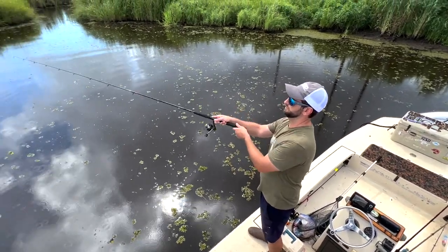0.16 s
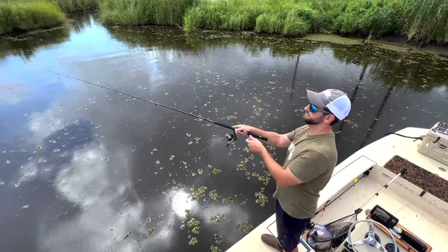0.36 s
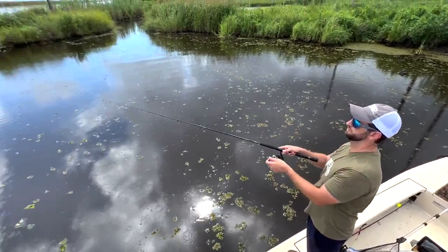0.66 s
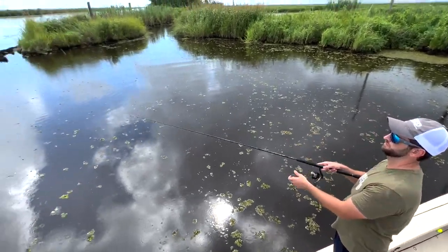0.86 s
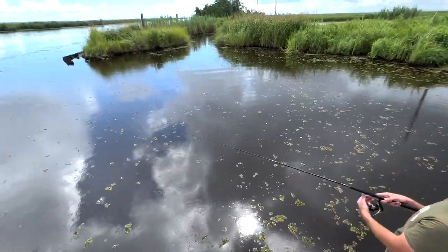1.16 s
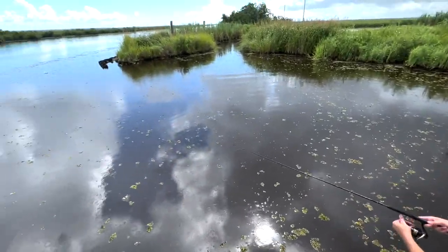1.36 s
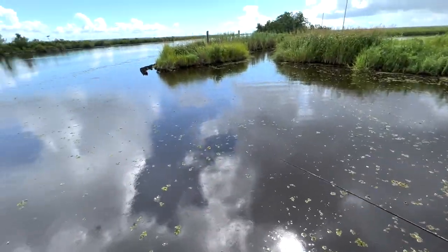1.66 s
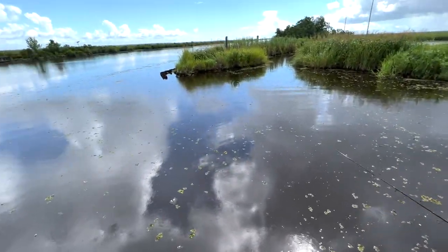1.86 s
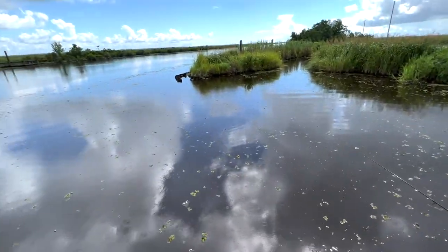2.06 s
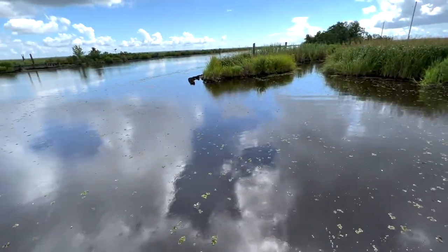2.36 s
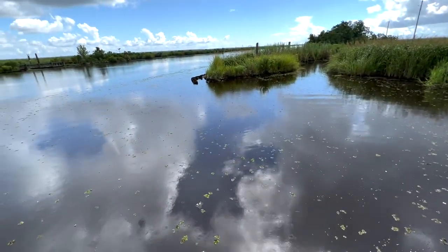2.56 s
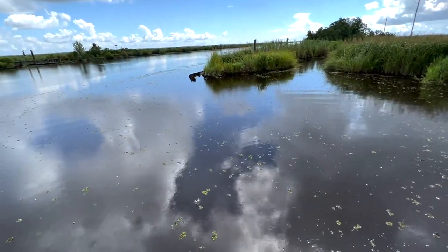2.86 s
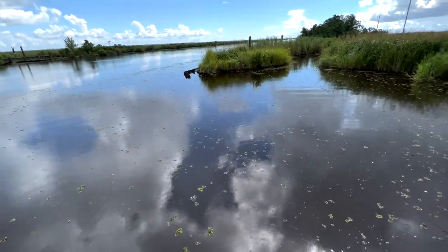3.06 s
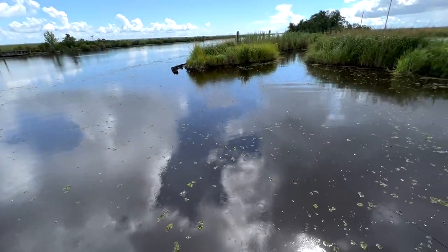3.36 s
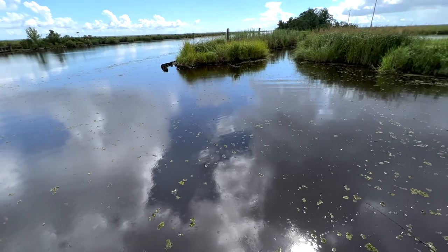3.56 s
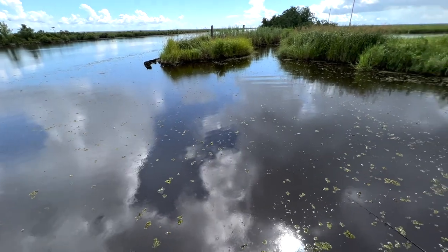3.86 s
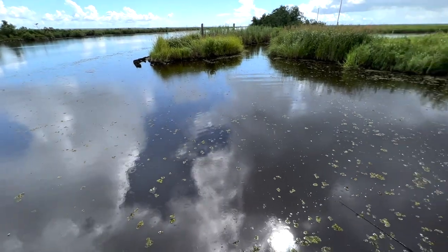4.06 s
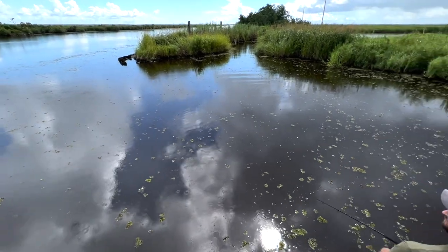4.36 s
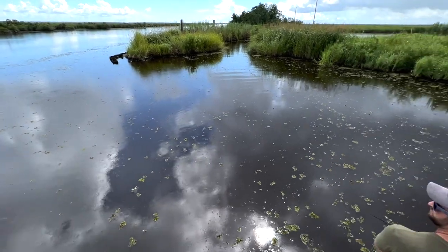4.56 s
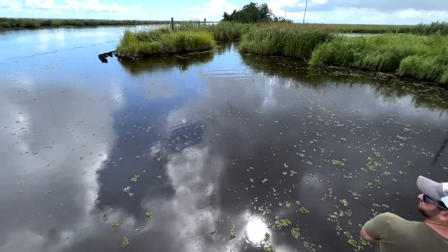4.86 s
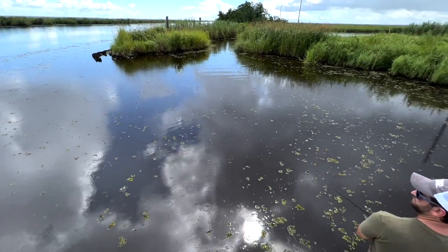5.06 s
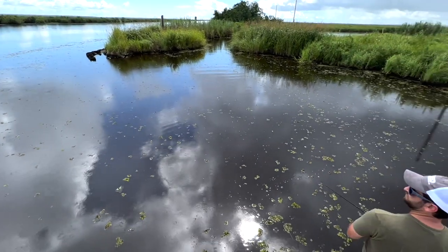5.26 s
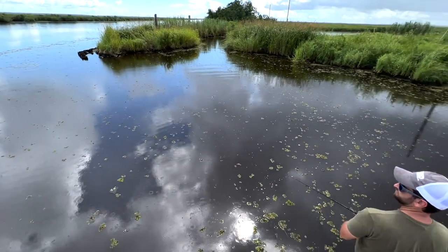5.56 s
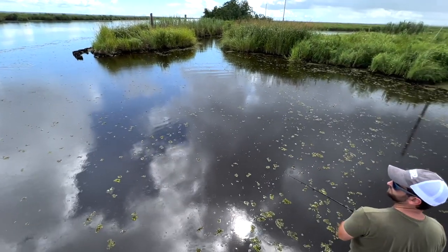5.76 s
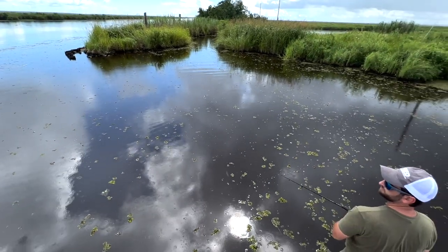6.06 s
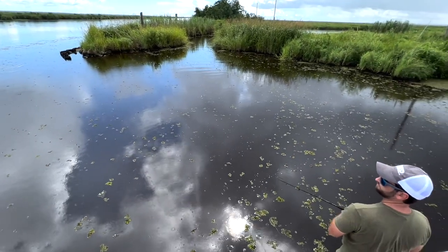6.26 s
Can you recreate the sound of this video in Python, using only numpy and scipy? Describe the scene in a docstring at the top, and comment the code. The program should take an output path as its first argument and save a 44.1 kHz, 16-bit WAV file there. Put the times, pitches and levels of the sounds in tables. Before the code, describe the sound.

A steady, shrill katydid buzz fills an open marsh from 0 to 6.4 seconds, gritty and throbbing about 24 times a second over a shimmering distant chorus. Low air thumps hit the left microphone in the first 0.2 seconds, with small tackle ticks and swishes until 0.7. A soft reel whirr pulses until about 2.9, while reeds rustle faintly and wind rumbles, dropping early then returning. Rapid falling chirps sound at 1.3, echoing lightly off water and reeds. The buzz swells hard left around 2.2 to 2.9. Hollow hull knocks land at 2.2 and in a cluster at 2.8 to 2.9. Another chirp follows at 3.0, then a gentle hiss from 3.4 to 4.2 and thin wavering left-side calls, mostly 3.8 to 4.0. A fainter chirp comes at 4.9. From 5.1 a rising, tumbling twitter repeats, clearest after 5.6, as high insect treble brightens.

```python
"""A small fishing boat in a marsh. From the start two katydids buzz over a chorus as the camera turns: gritty scrapes
throbbing with the wing strokes. Low thumps, a pulsing reel whirr, a rumbling wind, reeds and noise-burst scuffs join them.
Then come falling chirps, bent whistles doubled by the water, and knocks that ring the hull's modes. The reel fades
just before 3 s. High wavering calls and a soft swell of filtered hiss follow, and a twittering song ends the scene."""
import sys
import numpy as np
from scipy import signal
from scipy.fft import rfft, irfft, next_fast_len
from scipy.io import wavfile
from scipy.ndimage import uniform_filter1d

SR = 44100
rng = np.random.default_rng(int(sys.argv[2]) if len(sys.argv) > 2 else 0)


def store_wav(level_fs):
    """Save 16-bit WAV to argv[1]."""
    pcm = np.round(np.clip(np.atleast_2d(level_fs), -1, 1) * 32767)
    wavfile.write(sys.argv[1], SR, pcm.T.astype(np.int16))


N = 283241  # samples
TIME = np.arange(N) / SR  # s


def undb(db):
    """Decibels to gain."""
    return 10 ** (np.asarray(db) / 20)


def unit(x):
    """Scale to rms 1."""
    return x / np.sqrt(np.mean(x ** 2))


def curves(table):
    """Turn each column of a table of timed rows into a curve of straight lines."""
    times_s, *columns = np.transpose(table)
    return [np.interp(TIME, times_s, column) for column in columns]


def colour(x, points):
    """Filter by a spectrum of (pitch_hz, level_db) points; rms 1."""
    pitch_hz, level_db = np.transpose(points)
    size = next_fast_len(N)
    bins_hz = np.maximum(np.fft.rfftfreq(size, 1 / SR), 1)
    gains = undb(np.interp(np.log(bins_hz), np.log(pitch_hz), level_db))
    return unit(irfft(rfft(x, size) * gains, size)[..., :N])


def bandpass(x, low_hz, high_hz):
    """Keep one band with a second-order Butterworth filter."""
    return signal.sosfilt(signal.butter(2, [low_hz, high_hz], "band", fs=SR, output="sos"), x)


def noise(likeness, size=N):
    """Left and right white noise with a given correlation."""
    mid, side = rng.standard_normal((2, size))
    c = np.clip(likeness, -1, 1)
    return np.sqrt((1 + c) / 2) * mid + np.sqrt((1 - c) / 2) * np.array([side, -side])


def pan(left_minus_right_db):
    """Left and right gains for a level difference, at the same overall level."""
    gains = undb(np.array([[.5], [-.5]]) * left_minus_right_db)
    return gains / np.sqrt(np.mean(gains ** 2, axis=0))


def walk(rate_hz):
    """Random levels, rate_hz new ones a second, joined by slopes; rms 1."""
    hold = max(int(SR / rate_hz), 1)
    steps = np.repeat(rng.standard_normal(N // hold + 1), hold)
    return unit(uniform_filter1d(steps, hold)[:N])


def add(out, start_s, x):
    """Mix a short stereo sound in at a time."""
    i = max(int(start_s * SR), 0)
    out[:, i:i + x.shape[1]] += x[:, :N - i]


def scatter(x, echo_db, t60_s):
    """Add a dense, short echo that decays as random noise, different at each microphone."""
    t = TIME[:SR // 2]
    tail = rng.standard_normal((2, len(t))) * undb(-60 * t / t60_s)
    tail = unit(tail) / np.sqrt(len(t))
    return x + undb(echo_db) * signal.fftconvolve(x, tail, axes=1)[:, :N]


def mirrored(x, delay_s, level_db):
    """Add a single reflection off the water, at about the same overall level."""
    reflection = np.pad(x, ((0, 0), (int(delay_s * SR), 0)))[:, :N]
    return (x + undb(level_db) * reflection) / np.hypot(1, undb(level_db))


def katydid(stroke_hz, level_db, wing, throb_db, closing_db, tooth_db, likeness, stems_db):
    """The wings open and close once a stroke; uneven file teeth make each scrape gritty."""
    turn = 2 * np.pi * (np.cumsum(stroke_hz) / SR + .025 * walk(20))
    # pressure builds through the stroke and lets go quickly
    pressure_db = throb_db * np.cos(turn) + closing_db * np.sin(2 * turn) + 0.59 * walk(30)
    scrape = undb(pressure_db + tooth_db * walk(1500)) * noise(likeness)
    # echoes from nearby stems ripple the band into narrow peaks
    return colour(scatter(scrape, echo_db=stems_db, t60_s=0.017), wing) * undb(level_db)


PIP_HZ, PIP_PLACE_TURNS, PIP_HALF_LENGTH_S, PIP_SCATTER_DB = 9020, .09, .0024, 3


def pips(stroke_hz):
    """Once a stroke the file teeth fall in step with the wing's resonance and it rings cleanly."""
    turns = np.cumsum(stroke_hz) / SR - PIP_PLACE_TURNS
    from_pip_s = (turns - np.round(turns)) / stroke_hz
    tone = np.sin(2 * np.pi * np.cumsum(PIP_HZ * (1 + .012 * walk(60))) / SR)
    swell = np.exp(-(from_pip_s / PIP_HALF_LENGTH_S) ** 2)
    return unit(tone * swell * undb(PIP_SCATTER_DB * walk(25)))


# what the left katydid's wings radiate: pitch_hz, level_db
LEFT_WING_SPECTRUM = [(4000, -34), (5000, -22), (5700, -25), (6300, -20), (7250, -10), (8100, 0), (8500, 0),
                      (8900, 7), (9200, 6), (9450, 0), (10000, 2), (10200, -5), (11000, -9), (11600, -13),
                      (13000, -32), (16000, -45)]
# wing strokes of the left katydid: time_s, stroke_hz
LEFT_STROKE_RATE = [(0, 24.68), (2.3, 25.0), (3.9, 24.4), (6.42, 24.4)]
# it takes over as the buzz swings left
LEFT_DB, LEFT_ENTERS_AT_SIDE_DB, LEFT_ENTRY_WIDTH_DB = 2.5, -1.5, 1.5
PIP_DB = -8.5  # relative to the scrape
LEFT_ECHO_S, LEFT_ECHO_DB = .003465, -9


def left_katydid(buzz_db, side_db):
    """Scrapes and pure pips reach the camera twice, directly and off the water."""
    stroke_hz, = curves(LEFT_STROKE_RATE)
    scrape = katydid(stroke_hz, 0, LEFT_WING_SPECTRUM, throb_db=3.0, closing_db=0.6, tooth_db=0.7,
                     likeness=0.45, stems_db=-11)
    song = mirrored(scrape + undb(PIP_DB) * pips(stroke_hz), LEFT_ECHO_S, LEFT_ECHO_DB)
    facing_left = 1 / (1 + np.exp((LEFT_ENTERS_AT_SIDE_DB - side_db) / LEFT_ENTRY_WIDTH_DB))
    return song * undb(buzz_db + LEFT_DB) * facing_left * pan(13)


# the front katydid's broad treble: pitch_hz, level_db
FRONT_WING_SPECTRUM = [(5000, -35), (7000, -14), (8300, -7), (9400, -3), (10300, -3), (10800, -3),
                       (11300, 0), (11800, -1), (12500, -3), (14000, -5), (15100, -5), (16000, -8)]
# its main resonance, which favours the right microphone: pitch_hz, level_db
FRONT_RESONANCE = [(7000, -40), (8400, -10), (9250, -1), (9550, 0), (9900, -3), (10300, -8), (11050, -6),
                   (11500, -16), (13000, -40)]
# its wing strokes, drifting in and out of step with the left one: time_s, stroke_hz
FRONT_STROKE_RATE = [(0, 23.9), (1.5, 25.2), (2.2, 24.3), (3.5, 23.45), (4.2, 24.5), (6.42, 24.3)]
# its strokes stand out more once the camera faces it: time_s, throb_db
FRONT_THROB_DEPTH = [(0, 1.5), (1.6, 1.5), (2.1, 3.5), (6.42, 3.5)]
FRONT_DB, FRONT_PEAK_DB = 4.5, 5.5  # relative to the top treble


def front_katydid(treble_db):
    """Two layers share the stroke rate: a broad treble and a shallower-throbbing resonance."""
    stroke_hz, = curves(FRONT_STROKE_RATE)
    throb_db, = curves(FRONT_THROB_DEPTH)
    broad = katydid(stroke_hz, treble_db + FRONT_DB, FRONT_WING_SPECTRUM, throb_db=throb_db,
                    closing_db=0.8, tooth_db=0.8, likeness=0.92, stems_db=-8)
    peak = katydid(stroke_hz, treble_db + FRONT_PEAK_DB, FRONT_RESONANCE, throb_db=throb_db / 2,
                   closing_db=0.3, tooth_db=0.8, likeness=-0.8, stems_db=-6)
    return broad + peak * pan(-13.0)


# what the chorus's wings radiate: pitch_hz, level_db
CHORUS_SPECTRUM = [(4000, -26), (5000, -21), (6100, -11), (7200, -7), (8200, -1), (8700, 0), (9700, 0),
                   (10300, -6), (11500, -14), (13000, -25), (16000, -50)]


def chorus(level_db, side_db):
    """Many distant insects blur into a shimmering band of noise."""
    buzz = noise(-0.68) * undb(2.0 * walk(22) + 2.8 * walk(700))
    return colour(scatter(buzz, echo_db=1.5, t60_s=0.069), CHORUS_SPECTRUM) * undb(level_db) * pan(side_db)


# the far insects' hiss: pitch_hz, level_db
HISS_SPECTRUM = [(7000, -35), (10500, -7.5), (11500, -12), (13000, 26), (15000, -10), (16000, -10)]
HISS_DB = -7  # relative to the top treble


def far_hiss(treble_db):
    """The far insects merge into a high hiss that follows the treble."""
    return colour(noise(0.63), HISS_SPECTRUM) * undb(treble_db + HISS_DB)


# the insects as the camera turns: time_s, buzz_db, buzz_left_minus_right_db, top_treble_db
INSECT_LEVELS = [(0.0, -35.5, -4.5, -46), (0.82, -40.5, 0, -49.5), (1.11, -42, -0.5, -50),
                 (1.52, -40.5, 1.5, -47.5), (1.84, -39.5, 1, -51.5), (2.25, -33, 18, -48),
                 (2.66, -33.5, 17.5, -51.5), (2.95, -36, 9, -53), (3.24, -42.5, 15, -49),
                 (3.43, -38.5, 6, -49.5), (3.86, -38, -0.5, -51.5), (4.27, -40.5, 3, -50.5),
                 (5.09, -40, -2.5, -43.5), (5.42, -42.5, -1, -46), (6.42, -37, -1, -43)]
# the chorus gives way as the buzz swings left; its level is relative to the buzz
CHORUS_DB, CHORUS_YIELD, CHORUS_SIDE_SHARE = -1.5, 0.64, 0.1


def insects():
    """Two near katydids and the chorus trade places as the camera turns."""
    buzz_db, side_db, treble_db = curves(INSECT_LEVELS)
    others = chorus(buzz_db + CHORUS_DB - CHORUS_YIELD * side_db, CHORUS_SIDE_SHARE * side_db + 0.54)
    return left_katydid(buzz_db, side_db) + front_katydid(treble_db) + others + far_hiss(treble_db)


# low thumps on the left microphone: start_s, length_s, level_db
THUMP_PUFFS = [(0, 0.036, -40), (0.048, 0.046, -29.5), (0.116, 0.064, -29), (0.168, 0.047, -43)]
THUMP_HZ, THUMP_OCTAVE_DB = 70.6, -12


def thumps():
    """Puffs of air shake the microphone for a few slow cycles."""
    out = np.zeros((2, N))
    for start_s, length_s, level_db in THUMP_PUFFS:
        t = TIME[:int(length_s * SR)]
        turn = 2 * np.pi * (THUMP_HZ * t + rng.random())
        swing = (np.sin(turn) + undb(THUMP_OCTAVE_DB) * np.sin(2 * turn)) * np.hanning(len(t))
        add(out, start_s, unit(swing) * undb(level_db) * pan(16.15))
    return out


# the reel's whirr: pitch_hz, level_db
REEL_SPECTRUM = [(150, -0.5), (320, 7.5), (600, 2), (800, 1), (1150, 5.5), (1800, -3), (2400, -31),
                 (4000, -22), (9000, -6.5)]
# cranked evenly, then let go
REEL_PUSH_HZ, REEL_FIRST_PUSH_S = 3.55, .26
REEL_DB, REEL_STOP_S, REEL_FADE_DB_PER_S = -51, 2.915, 79


def reel(push_db):
    """The gears whirr harder on each push of the handle."""
    push = np.cos(np.pi * REEL_PUSH_HZ * (TIME - REEL_FIRST_PUSH_S)) ** 2
    whirr = colour(noise(0.69) * undb(push_db * push ** 2 + 3.2 * walk(250)), REEL_SPECTRUM)
    level_db = REEL_DB - REEL_FADE_DB_PER_S * np.maximum(TIME - REEL_STOP_S, 0)
    return whirr * undb(level_db) * pan(4.9)


# the wind drops, picks up unevenly and holds: time_s, level_db
WIND_LEVEL = [(0, -43.5), (0.45, -57.5), (1.35, -49.5), (2.0, -52.5), (2.75, -45), (6.42, -46)]
# its rumble on the microphones: pitch_hz, level_db
RUMBLE_SPECTRUM = [(15, -47), (25, -19), (35, -9), (55, -2), (80, -0.5), (110, 0), (135, -10), (180, -10.5),
                   (230, -11), (280, -20), (400, -20.5), (900, -69.5)]


def wind_rumble():
    """Eddies buffet the microphones as low, slightly uneven noise."""
    rumble = colour(noise(0.73) * undb(0.5 * walk(18)), RUMBLE_SPECTRUM)
    return rumble * undb(curves(WIND_LEVEL)[0]) * pan(-1.6)


# open air over the marsh: pitch_hz, level_db
AIR_SPECTRUM = [(100, -4.5), (250, 2), (420, -1), (600, 1.5), (780, -4.5), (1300, -7), (1900, -12),
                (2400, -22.5), (4000, -28), (6000, -43), (12000, -17)]


def marsh_air(level_db):
    """The hush of the open marsh is broad noise with a slow, slight waver."""
    return colour(noise(0.22), AIR_SPECTRUM) * undb(level_db + 0.65 * walk(5.5))


# rustle of the reeds: time_s, level_db
REED_LEVEL = [(0, -45.5), (.45, -50), (.8, -54.5), (1.4, -53), (2, -63.5), (4.3, -60.5), (6.42, -100)]


def reeds():
    """Leaves rustle as flickering noise with short echoes, strongest near 1.5 kHz."""
    leaves = scatter(noise(0) * undb(0.5 * walk(37)), echo_db=4.0, t60_s=0.027)
    # pitch_hz, level_db
    rustle = colour(leaves, [(500, -12), (900, 6), (1450, 13), (2600, 5.5), (3500, 2), (6000, 9.0),
                             (12000, -39.0)])
    return rustle * undb(curves(REED_LEVEL)[0]) * pan(4.6)


# ticks and scuffs of tackle and clothing: start_s, length_s, centre_hz, level_db, left_minus_right_db
SCUFF_RUBS = [(0.045, 0.028, 10100, -35, -1), (0.217, 0.075, 1200, -54, 2), (0.263, 0.057, 9650, -40, -1.5),
              (0.32, 0.0041, 9200, -31.5, -2), (0.43, 0.005, 7160, -40, 1.5),
              (0.47, 0.0052, 7000, -40.5, 3), (1.082, 0.025, 2865, -53.5, -3),
              (1.178, 0.01, 5850, -46.5, 5), (1.404, 0.022, 5630, -41.5, 5), (2.407, 0.11, 1120, -52, 13),
              (2.696, 0.055, 1240, -51.5, 9), (2.847, 0.016, 6200, -49, 15),
              (2.858, 0.057, 5200, -49.5, 12), (2.922, 0.025, 1320, -51, 11), (3.883, 0.078, 1480, -56, 5),
              (4.157, 0.0069, 1940, -48.5, -1), (4.418, 0.12, 1447, -51.5, 8),
              (4.437, 0.079, 3760, -59.5, 6), (6.332, 0.0077, 2610, -54, 0)]
# quick even swishes of tackle
SWISH_FIRST_S, SWISH_EVERY_S, SWISH_S, SWISH_HZ, SWISH_DB = 0.459, 0.072, 0.042, 11000, -42.5
# a briefer contact is broader: bandwidth as a share of the centre for a tick, and how it narrows with length
TICK_S, TICK_WIDTH, NARROWING = 0.0023, 0.61, 0.073


def scuffs(count):
    """Brief rubs and a run of count swishes: each a gritty swell of friction in one broad resonance."""
    out = np.zeros((2, N))
    swishes = [(SWISH_FIRST_S + k * SWISH_EVERY_S, SWISH_S, SWISH_HZ, SWISH_DB, 0) for k in range(count)]
    for start_s, length_s, centre_hz, level_db, side_db in SCUFF_RUBS + swishes:
        size = int(length_s * SR)
        width_hz = centre_hz * TICK_WIDTH * (TICK_S / length_s) ** NARROWING
        edges_hz = np.clip([centre_hz - width_hz / 2, centre_hz + width_hz / 2], 100, SR * .45)
        grit = noise(0.33, size=size) * undb(6.1 * rng.standard_normal(size)) * np.hanning(size)
        add(out, start_s, unit(bandpass(grit, *edges_hz)) * undb(level_db) * pan(side_db))
    return out


# the open beak favours the octave near this pitch; every note fades over its length
BEAK_HZ, BEAK_HALF_WIDTH_HZ, NOTE_FADE_DB = 5230, 810, 1


def bird(notes, rough, octave_db, right_lag_ms):
    """Each note is a whistle bent through three pitches; flutter in the syrinx roughens it."""
    out, waver = np.zeros((2, N)), walk(900)
    for start_s, length_s, first_hz, middle_hz, last_hz, level_db, side_db in notes:
        u = np.linspace(0, 1, int(length_s * SR))  # place in the note
        pitch_hz = np.polyval(np.polyfit([0, .5, 1], [first_hz, middle_hz, last_hz], 2), u)
        flutter = rough * np.roll(waver, -int(start_s * SR))[:len(u)]
        cycles = np.cumsum(pitch_hz * (1 + flutter)) / SR
        phase = 2 * np.pi * np.array([cycles, cycles - pitch_hz * right_lag_ms / 1000])
        beak = undb(octave_db) / (1 + ((2 * pitch_hz - BEAK_HZ) / BEAK_HALF_WIDTH_HZ) ** 2)
        envelope = signal.windows.tukey(len(u), .38) * undb(-NOTE_FADE_DB * u)
        tone = (np.sin(phase) + beak * np.sin(2 * phase)) * envelope
        add(out, start_s, unit(tone) * undb(level_db) * pan(side_db))
    return out


# a chirp is two quick slides, often with a low tail:
# start_s, length_s, first_hz, middle_hz, last_hz, level_db, left_minus_right_db
CHIRP_SLIDES = [(1.266, 0.037, 3950, 3360, 2720, -38.5, 10.5), (1.275, 0.021, 4050, 3760, 3450, -44, 8),
                (1.297, 0.039, 3770, 2850, 2290, -43, 3), (1.33, .06, 2384, 2520, 2400, -47.5, 4),
                (1.351, 0.034, 3890, 3370, 2640, -43, 12), (1.383, 0.032, 3710, 3170, 2900, -43, 10),
                (3.028, .031, 3920, 3570, 2820, -40, 16), (3.057, 0.033, 3910, 3170, 2800, -43.5, 5),
                (3.094, 0.034, 2630, 2300, 2320, -50, 5), (3.129, 0.038, 2240, 2270, 2190, -53, 5),
                (4.942, 0.033, 3910, 3440, 2830, -49.5, 14), (4.968, 0.046, 3560, 3080, 2700, -50, 6.5),
                (5.005, 0.053, 2630, 2430, 2400, -58, 2)]
MIRROR_S, MIRROR_DB = .008, -12  # the water mirrors the chirps and the song


def chirps():
    """Rough falling slides, doubled by the water and trailed by echo from the reeds."""
    calls = bird(CHIRP_SLIDES, rough=0.018, octave_db=-5, right_lag_ms=0.14)
    return scatter(mirrored(calls, MIRROR_S, MIRROR_DB), echo_db=-8, t60_s=.4)


# ringing modes of the hull and deck: pitch_hz, level_db, t60_s
HULL_MODES = [(70.6, -15, 0.1), (110.6, -9.5, 0.39), (159, -12.5, 0.1), (247.5, -8, 0.137),
              (400, 2, 0.0175), (584.5, 9, 0.033), (860, -13, 0.018), (1000, -10, 0.027),
              (1220, 3.5, 0.0276), (1320, 0, 0.074), (1780, -34, .03)]
# steps and knocks: start_s, peak_db (before panning), highest_excited_hz (at least 90), left_minus_right_db
HULL_KNOCKS = [(2.198, -20.5, 1210, -7), (2.205, -23, 770, -1), (2.803, -22.5, 1400, -3),
               (2.811, -23, 182, 0), (2.851, -33, 500, 6), (2.865, -28, 280, -10.5), (2.889, -29, 1330, 20),
               (2.895, -34.5, 400, 2), (2.93, -31, 109, 5.5)]


def knocks(rattle_db):
    """Blows ring the hull and a short, dull noise rattle; a soft sole reaches only the low modes."""
    out, t = np.zeros((2, N)), TIME[:SR // 3]
    ring = sum(undb(level_db - 60 * t / t60_s) * np.sin(2 * np.pi * pitch_hz * t)
               for pitch_hz, level_db, t60_s in HULL_MODES)
    lowpass = signal.butter(6, 1800, fs=SR, output="sos")
    for start_s, peak_db, contact_hz, side_db in HULL_KNOCKS:
        rattle = signal.sosfilt(lowpass, noise(0.11, size=len(t))) * undb(rattle_db - 60 * t / 0.063)
        blow = bandpass(ring + rattle, 55, max(contact_hz, 90))
        add(out, start_s, blow / np.abs(blow).max() * undb(peak_db) * pan(side_db))
    return out


# thin, wavering high calls: start_s, length_s, first_hz, middle_hz, last_hz, level_db, left_minus_right_db
WHISTLE_NOTES = [(3.375, 0.086, 4750, 5300, 5600, -62, 15), (3.772, 0.082, 6800, 6790, 6500, -54, 20),
                 (3.815, 0.052, 5450, 5800, 5400, -54, 20), (3.878, 0.04, 5500, 5780, 5420, -54, 21.5),
                 (3.924, 0.034, 5500, 5550, 5400, -51, 21), (3.965, 0.075, 5550, 5320, 5100, -58, 20)]


def whistle():
    """Thin high notes bend and waver, with almost no octave."""
    return bird(WHISTLE_NOTES, rough=0.02, octave_db=-22, right_lag_ms=0)


# colour of the soft hiss: pitch_hz, level_db
SWELL_SPECTRUM = [(150, -6), (400, 1), (1100, -5), (1550, 4), (1900, -3.5), (2900, -8), (3450, -32),
                  (3750, -7), (4800, -2.5), (5600, -1), (6500, -18), (12000, -29)]
SWELL_START_S, SWELL_RISE_S, SWELL_FALL_S, SWELL_DB = 3.41, 0.16, 0.65, -50.5


def soft_hiss():
    """A soft hiss that swells fast and fades slowly, a little to the left."""
    knots_s = [0, SWELL_RISE_S, SWELL_RISE_S + SWELL_FALL_S]
    swell = np.interp(TIME - SWELL_START_S, knots_s, [0, 1, 0])
    hiss = colour(noise(0.43) * undb(2 * walk(120)), SWELL_SPECTRUM)
    return hiss * swell * undb(SWELL_DB) * pan(7.2)


def phrases(calls, notes):
    """Every call repeats the same notes at its own strength, swelling or fading as it goes."""
    return [(start_s + delay_s, length_s, first_hz, middle_hz, last_hz,
             level_db + swell * delay_s + note_db, side_db)
            for start_s, level_db, swell in calls
            for delay_s, length_s, first_hz, middle_hz, last_hz, note_db, side_db in notes
            if start_s + delay_s < N / SR]


# phrases of the twittering song: start_s, level_db, swell_db_per_s
SONG_CALLS = [(5.141, -64.5, 36), (5.626, -52.5, -1), (6.111, -54.5, -19)]
# one phrase, a long rise and a tumble of short notes, levels relative to the phrase:
# delay_s, length_s, first_hz, middle_hz, last_hz, level_db, left_minus_right_db
SONG_PHRASE = [(-0.03, 0.03, 2460, 2350, 2200, -18, -3), (0, 0.0305, 2180, 2460, 3000, -7, -4),
               (0.031, 0.092, 3400, 4020, 4990, -1, 6), (0.162, 0.0325, 4966, 4220, 3780, -1, 7.5),
               (0.228, 0.036, 4090, 4280, 4500, -2.5, 3), (0.267, 0.033, 3850, 4270, 4480, 0.5, 3),
               (0.31, 0.031, 3650, 3810, 3240, -0.5, 5.5), (0.354, 0.023, 2960, 2730, 2480, -12, 1)]


def twitter():
    """A repeated phrase of bent whistles, doubled by the water."""
    song = bird(phrases(SONG_CALLS, SONG_PHRASE), rough=0.019, octave_db=-22, right_lag_ms=0)
    return mirrored(song, MIRROR_S, MIRROR_DB)


def scene():
    """Insects and birds in the reeds, the boat close by, wind all round."""
    wind = wind_rumble() + marsh_air(level_db=-55.5) + reeds()
    tackle = scatter(scuffs(count=3), echo_db=0.0, t60_s=0.14)
    boat = reel(push_db=8) + tackle + knocks(rattle_db=17.0)
    birds = chirps() + scatter(whistle() + twitter(), echo_db=-7, t60_s=.45)
    return insects() + thumps() + wind + boat + soft_hiss() + birds


# dips in the camera's microphone response: centre_hz, width_hz
MIC_DIPS = [(5350, 170), (7680, 860)]
TOP_HZ = 15700


def record(dry):
    """The microphone ports notch the treble and the camera cuts the top."""
    for centre_hz, width_hz in MIC_DIPS:
        dry = signal.lfilter(*signal.iirnotch(centre_hz, centre_hz / width_hz, fs=SR), dry)
    return signal.sosfilt(signal.ellip(10, .2, 70, TOP_HZ, fs=SR, output="sos"), dry)


dry = scene()
out = record(dry)
store_wav(out)
```